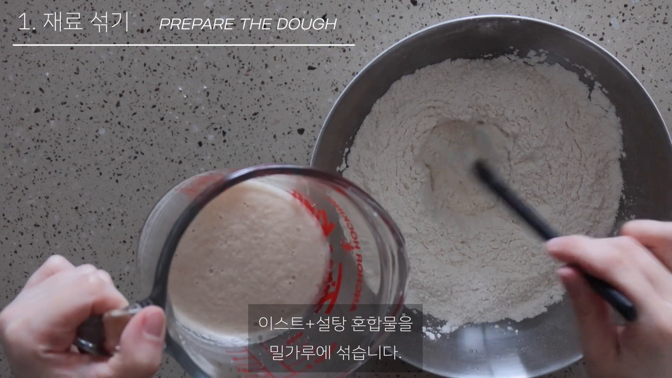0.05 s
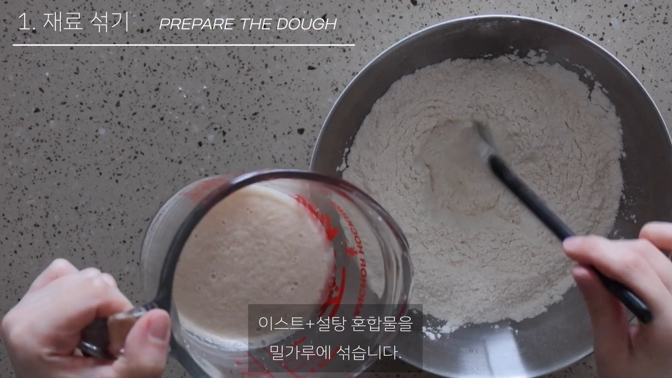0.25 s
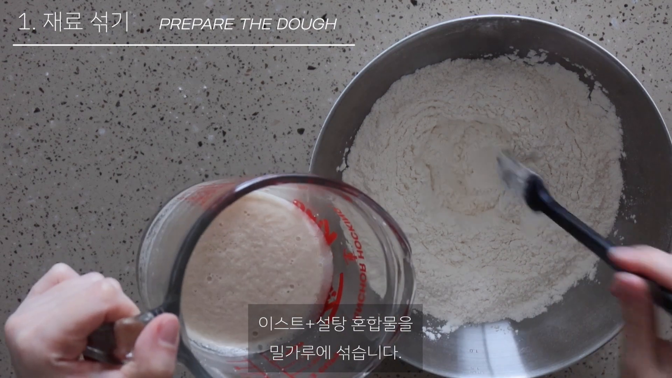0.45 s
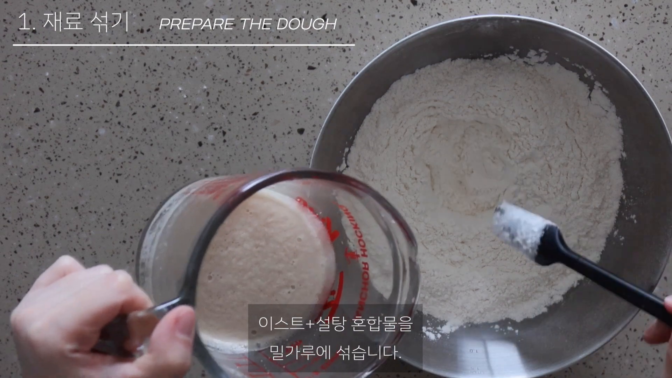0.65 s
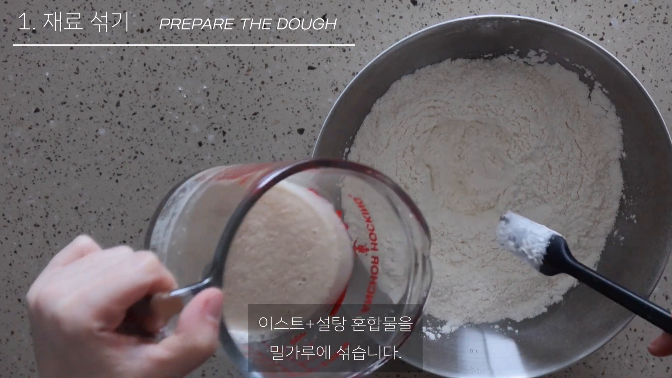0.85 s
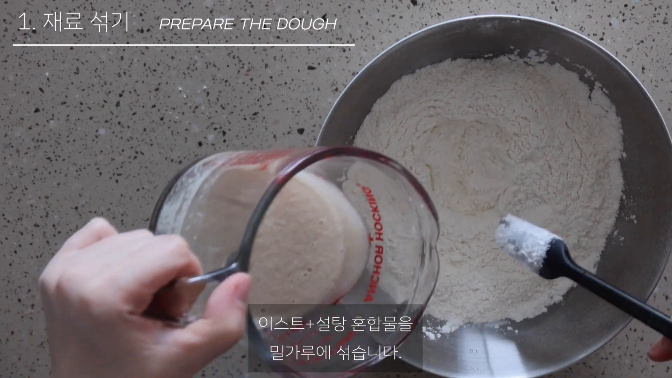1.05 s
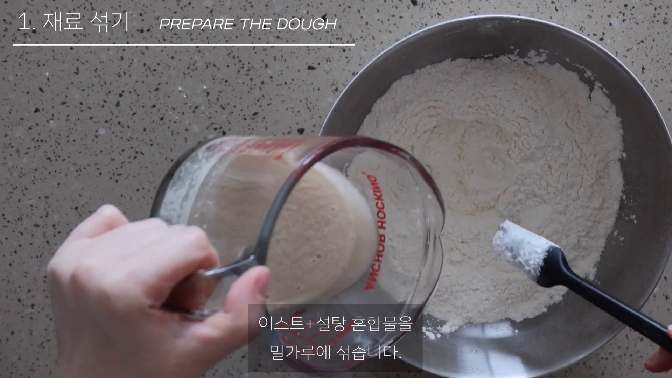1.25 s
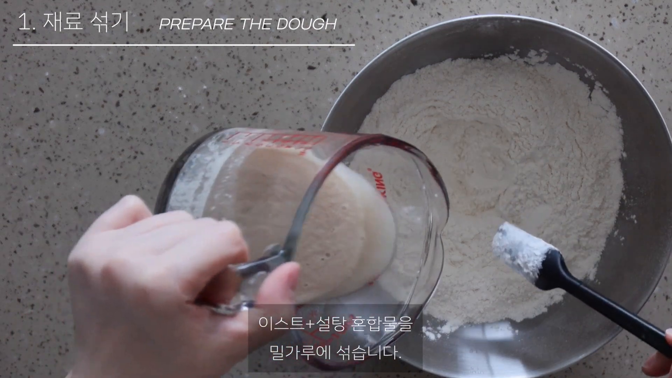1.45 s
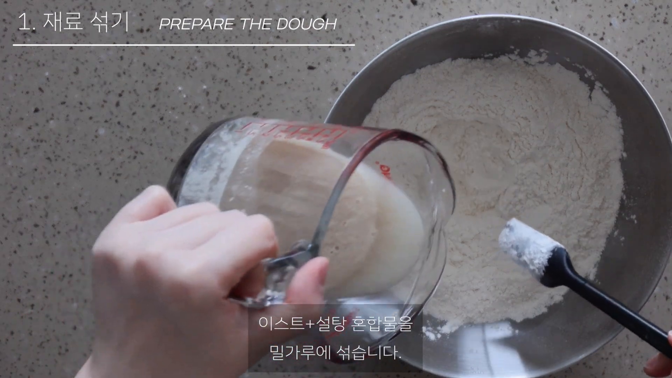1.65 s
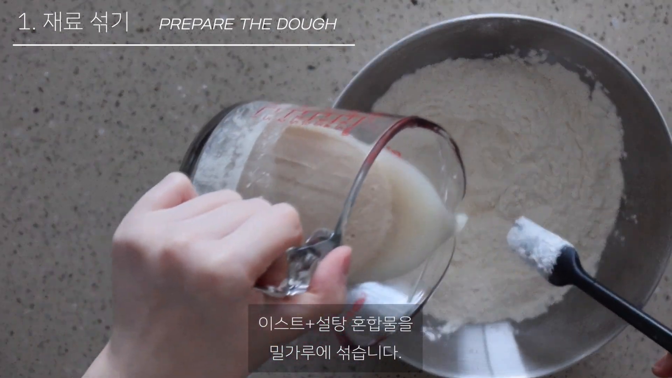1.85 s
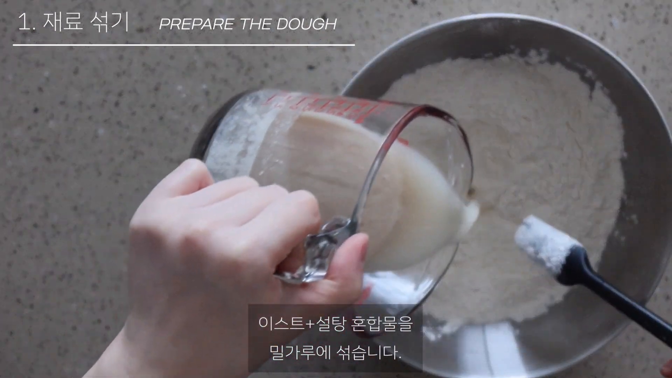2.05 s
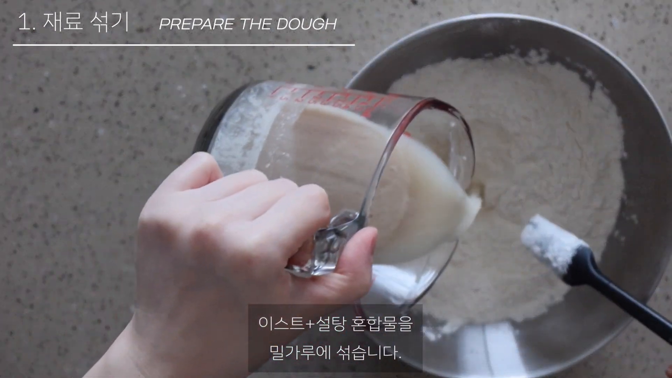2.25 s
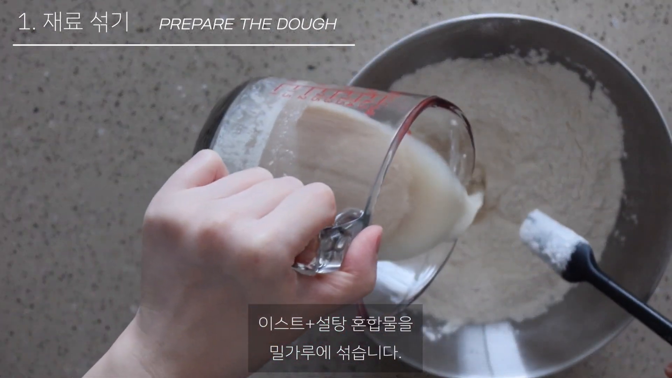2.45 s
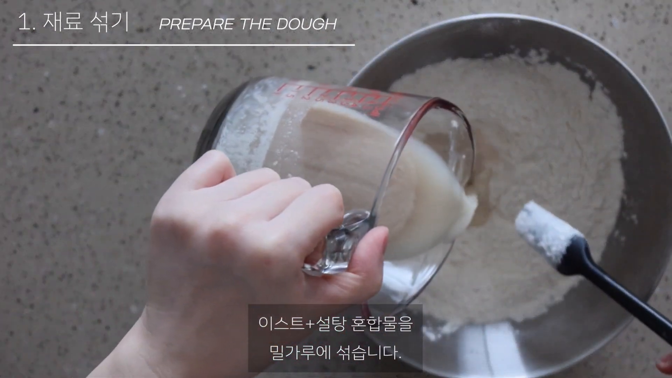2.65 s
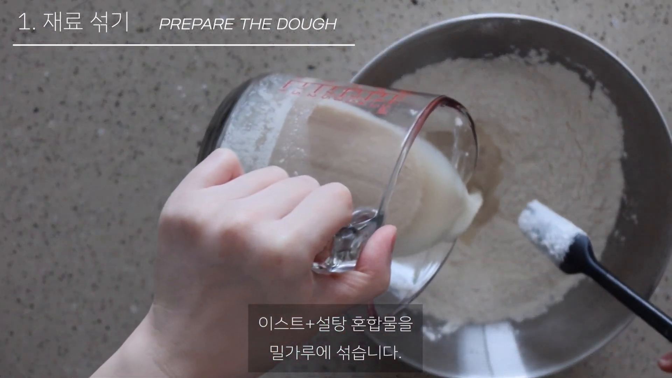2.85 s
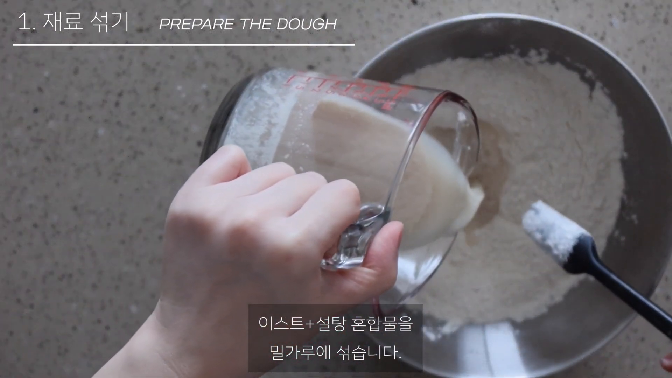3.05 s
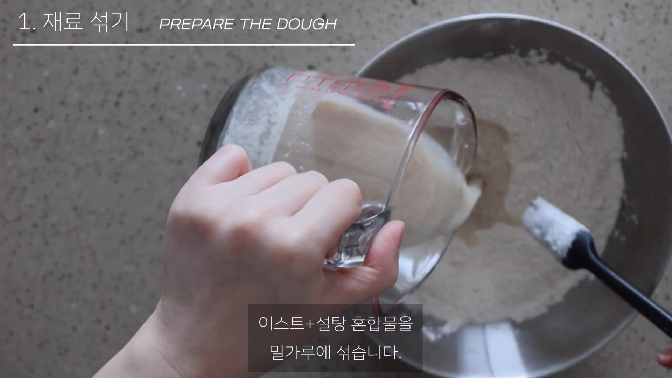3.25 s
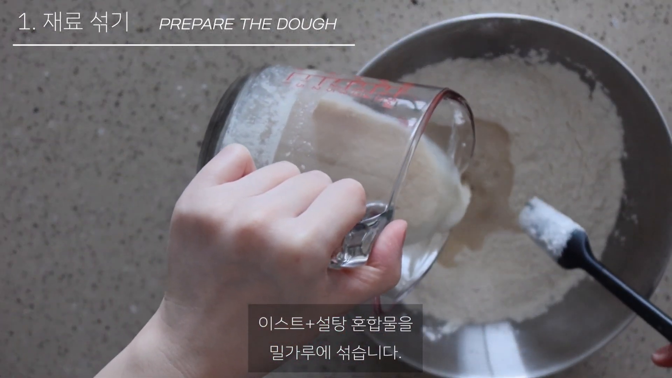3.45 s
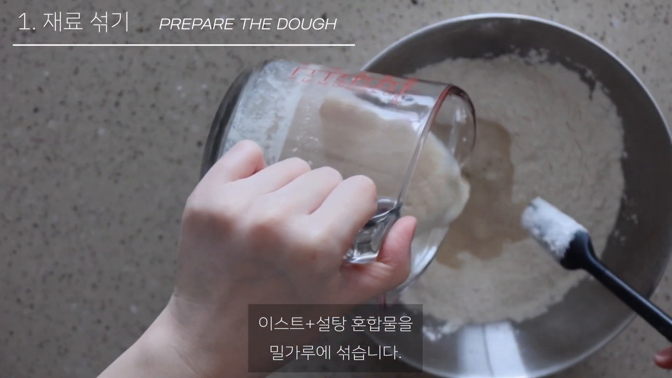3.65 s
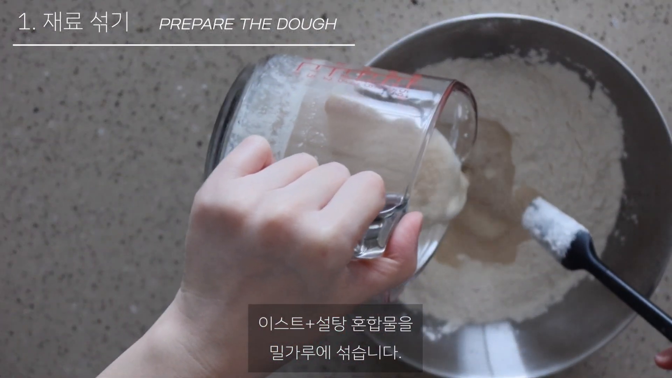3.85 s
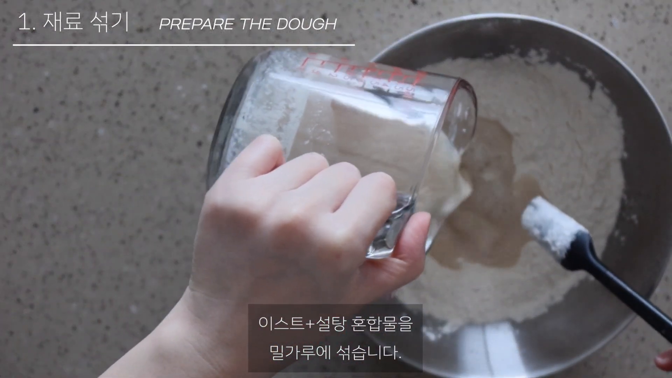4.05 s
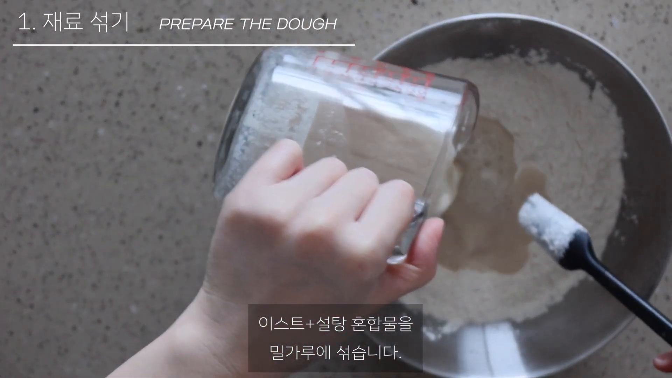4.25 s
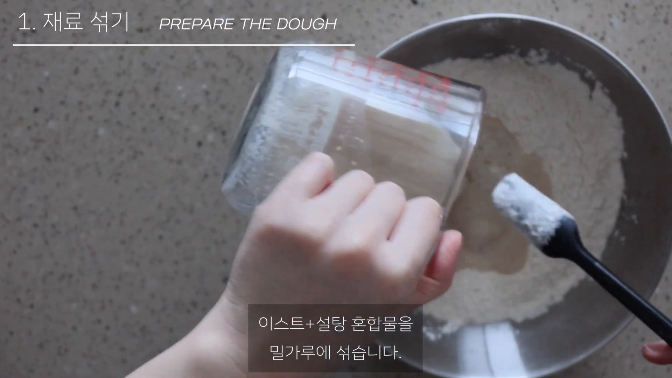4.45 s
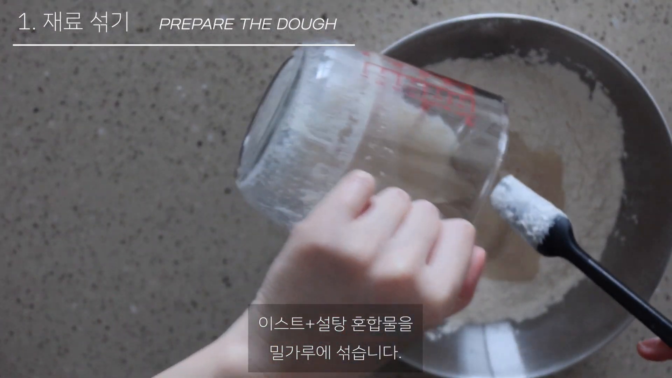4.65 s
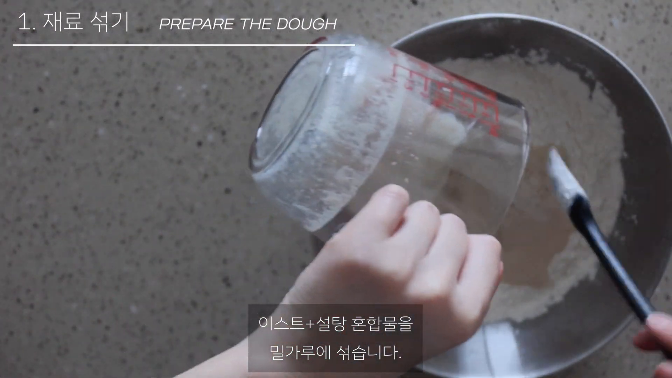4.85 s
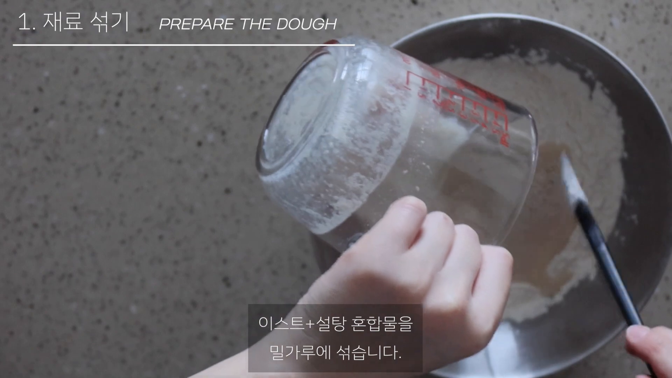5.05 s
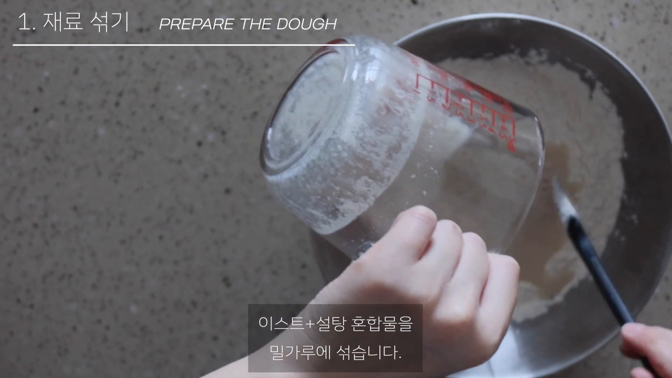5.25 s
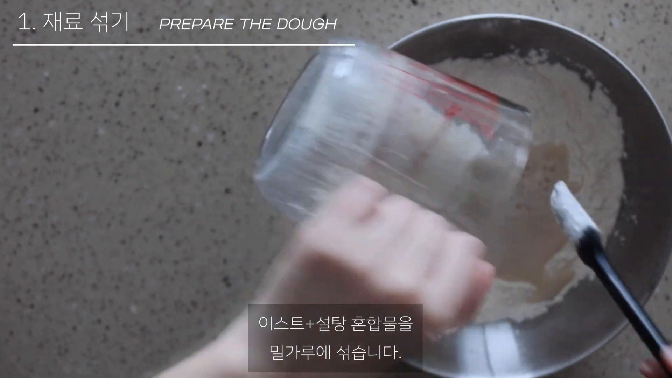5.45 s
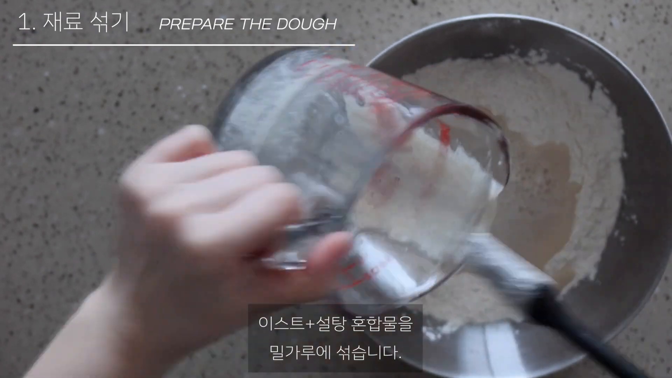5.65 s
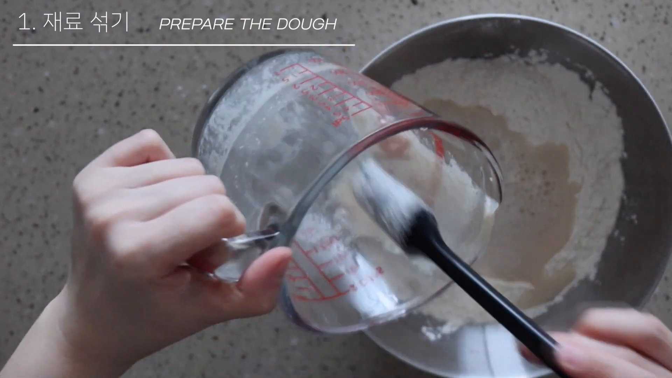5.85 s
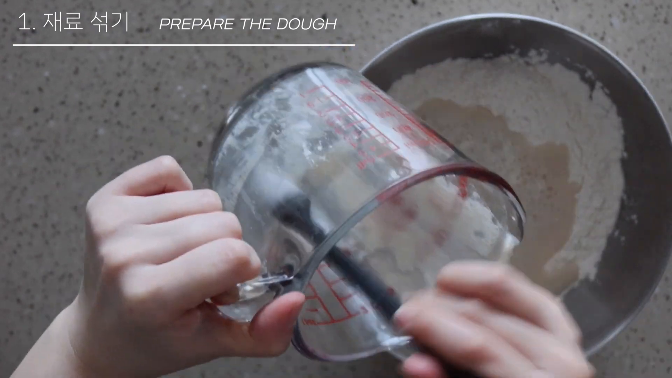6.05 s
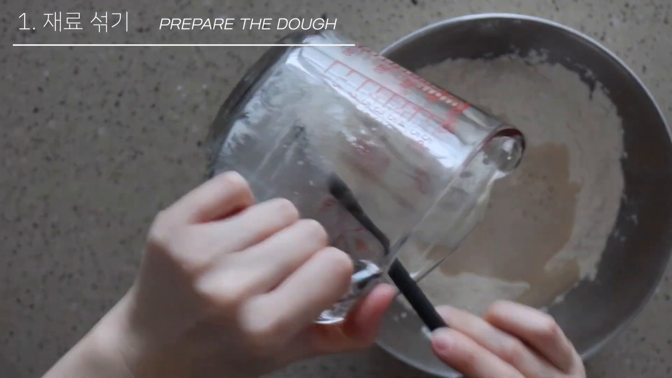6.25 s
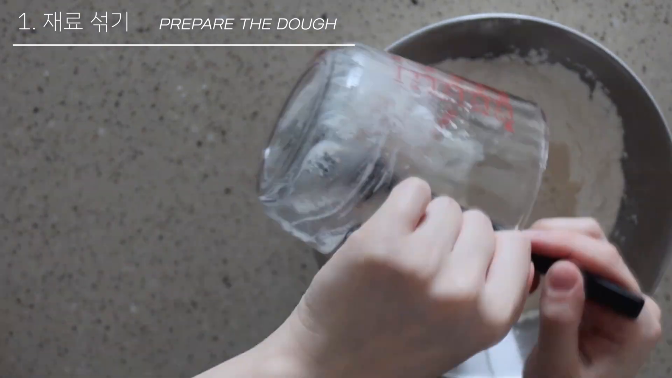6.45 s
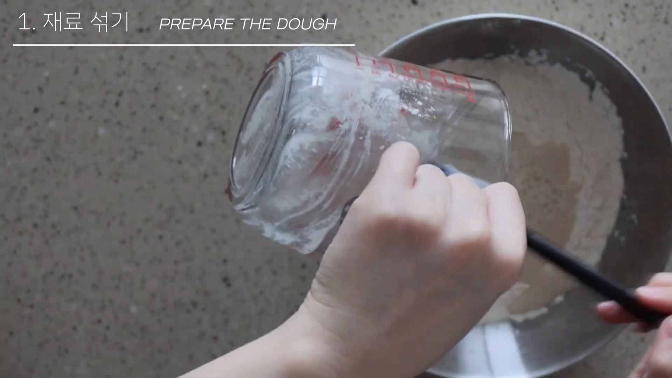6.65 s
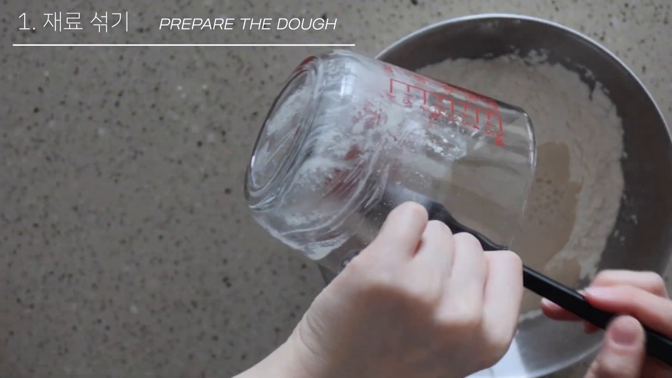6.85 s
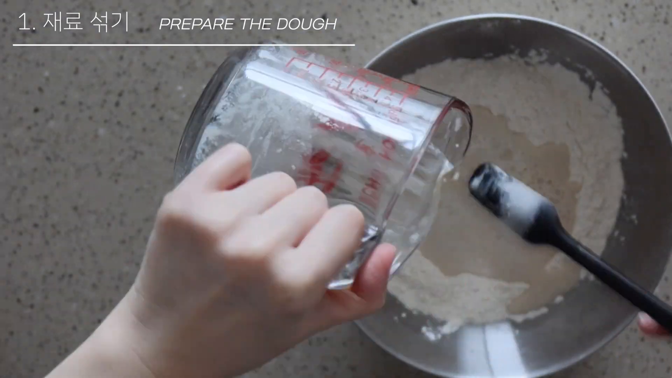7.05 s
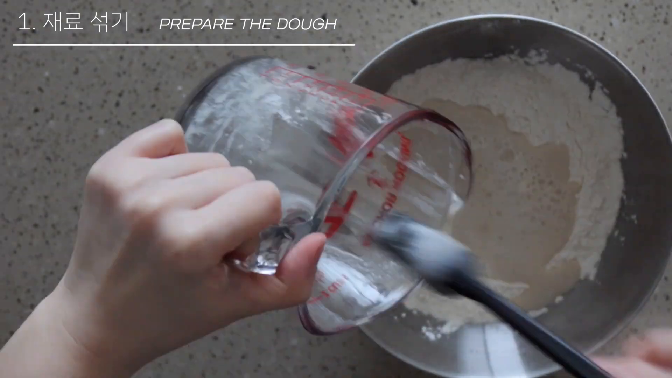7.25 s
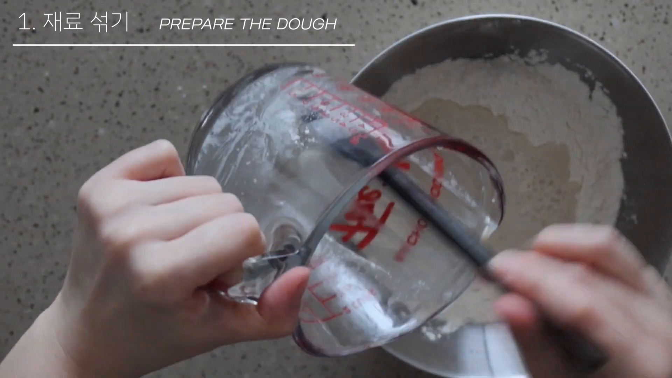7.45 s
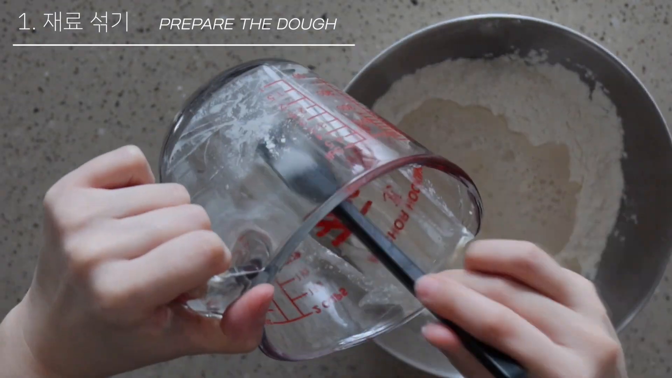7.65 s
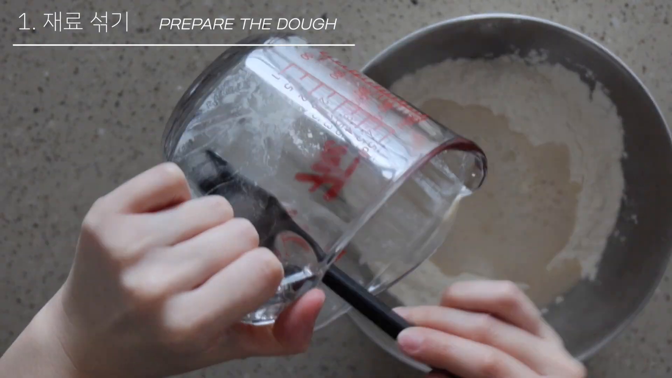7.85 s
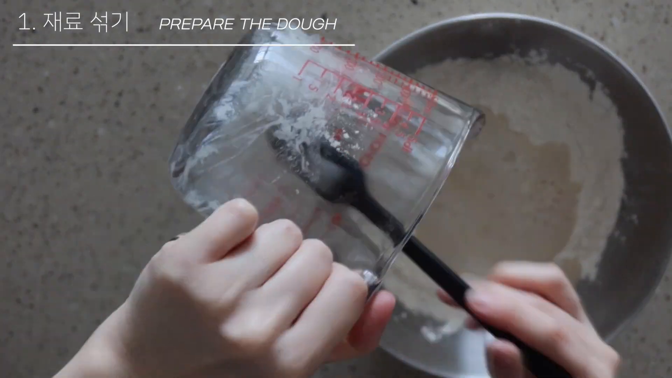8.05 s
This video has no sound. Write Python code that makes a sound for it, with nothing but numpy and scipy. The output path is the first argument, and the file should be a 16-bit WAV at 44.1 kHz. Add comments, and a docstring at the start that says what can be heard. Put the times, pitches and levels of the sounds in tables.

```python
"""A quiet kitchen murmurs (shaped noise and a hum) under hiss; a spatula knocks a steel bowl's rim, which rings.
Foamy liquid pours from a glass cup into flour in the bowl: bubbles made of short fading sine tones, with fizz.
Dull filtered-noise bumps come through the worktop during and just after the pour. Then the background steps down.
Last, the wet silicone spatula squeaks and taps in the cup: uneven overtones, thuds and ticks set the glass ringing."""
import sys
import numpy as np
from scipy import signal
from scipy.fft import rfft, irfft
from scipy.io import wavfile
from scipy.ndimage import uniform_filter1d

SR = 44100
rng = np.random.default_rng(int(sys.argv[2]) if len(sys.argv) > 2 else 0)


def generate_wav(signal):
    """Clip the signal to [-1, 1] and save it as 16-bit WAV at the path in sys.argv[1]."""
    frames = np.transpose(np.atleast_2d(signal))
    scaled = np.clip(frames, -1, 1) * 32767
    pcm = np.round(scaled).astype(np.int16)
    wavfile.write(sys.argv[1], SR, pcm)


N = 357193


def undb(db):
    """Turn decibels into a plain volume factor."""
    return 10 ** (np.asarray(db) / 20)


def unit(x):
    """Scale a sound to an average (rms) level of 1."""
    return x / np.sqrt(np.mean(x ** 2))


def curve(table):
    """Draw straight lines between a table's times: each column at every sample."""
    s, *columns = np.transpose(table)
    return [np.interp(np.arange(N) / SR, s, c) for c in columns]


def add(out, s, x):
    """Mix sound x into out, starting at s seconds."""
    i = int(s * SR)
    out[i:i + len(x)] += x[:N - i]


def coloured(points):
    """Noise shaped to a (frequency [Hz], level [dB]) spectrum, rms 1."""
    hz, db = np.transpose(points)
    f = np.maximum(np.fft.rfftfreq(N, 1 / SR), 1)
    gain_db = np.interp(np.log(f), np.log(hz), db, left=-90, right=-90)
    return unit(irfft(rfft(rng.standard_normal(N)) * undb(gain_db), N))


def band(x, hz, width):
    """Keep mostly the sound around hz, with gain 1 at the centre (a two-pole resonance)."""
    return signal.lfilter(*signal.iirpeak(min(hz, .4 * SR), hz / width, SR), x)


def ring(x, modes):
    """Let x strike a solid body: each mode is a tone that dies away by 60 dB in t60 seconds."""
    out = 0
    for k, (hz, db, t60) in enumerate(modes):
        r = np.exp(-np.log(1000) / (t60 * SR))
        w = 2 * np.pi * hz / SR
        tone = np.sin(w) * signal.lfilter([1], [1, -2 * r * np.cos(w), r * r], x)
        out = out + (-1) ** k * undb(db) * tone  # neighbours swing in opposite sense
    return out


def grain(hz, cycles, glide):
    """A bubble: a fading sine that swells within about a cycle and can slide up in pitch."""
    t = np.arange(int(4 * cycles / hz * SR) + 8) * hz / SR  # time counted in cycles
    tone = np.sin(2 * np.pi * t * (1 + glide * t / cycles))
    return tone * np.exp(-2.5 * t / cycles) * (1 - np.exp(-t / .45))


def walk(rate):
    """Slow random drift: a new target every 1 / rate seconds, joined by slopes; rms 1."""
    k = int(SR / rate)
    held = np.repeat(rng.standard_normal(N // k + 1), k)
    return unit(uniform_filter1d(held, k)[:N])


def kitchen_air():
    """Low murmur, a faint appliance hum and microphone hiss; also gives the hiss for the stereo difference."""
    # background over time: (time [s], murmur level [dB], hiss level [dB])
    air_levels = [(0, -67.5, -68), (.5, -63.5, -68.5), (1.0, -64.5, -67.5), (1.7, -65.5, -68),
                  (2.6, -62, -68.5), (3.6, -62, -65.5), (4.6, -64, -66), (5.5, -66, -67),
                  (5.885, -64.5, -67), (5.9, -71.5, -75), (8.1, -73.5, -75)]
    # colour of the murmur before scaling: (frequency [Hz], level [dB])
    murmur_spectrum = [(12, -27.5), (20, 2), (27, 0.5), (65, -3), (92, 0), (275, -2), (354, -0.5),
                       (464, -4), (494, -1), (538, -3.5), (3000, -16), (3900, -40.5), (6600, -120)]
    # colour of the hiss before scaling: (frequency [Hz], level [dB])
    hiss_spectrum = [(880, -37), (1500, -12), (2300, -6), (2740, -4), (3730, -0.5), (4080, -2.5),
                     (6240, -1.5), (14300, -4.5), (16000, -8.5)]
    hum_hz, hum_db = 499, -15.5  # level relative to the murmur, before its drift

    murmur_db, hiss_db = curve(air_levels)
    hum = undb(hum_db + 2.0 * walk(3.6)) * unit(band(rng.standard_normal(N), hum_hz, 4.6))
    murmur = undb(murmur_db + 1.0 * walk(2.986)) * (coloured(murmur_spectrum) + hum)
    hiss = undb(hiss_db) * coloured(hiss_spectrum)
    side_hiss = undb(hiss_db - 21) * unit(band(rng.standard_normal(N), 13500, 2500))
    return murmur + hiss, side_hiss


def knocks():
    """A soft push rings the bowl's metal; flour adds a dull rattle of noise."""
    # knock on the bowl rim and its small rebounds: (time [s], level before offsets [dB])
    knock_times = [(.919, -11), (0.939, -48), (.962, -30), (1.001, -36), (1.03, -36)]
    # ringing tones of the steel bowl: (frequency [Hz], relative level [dB], t60 [s])
    bowl_modes = [(29, -21, 1.25), (61, -14, 0.67), (100, -12, 0.39), (159, -7.5, 0.38), (183.3, -4.5, 0.4),
                  (260, -5, 0.32), (235, 0, 0.18), (287.5, -2.5, 0.34), (404, -9, 0.22), (494, 11, 0.093),
                  (535, 1, 0.16), (590, 4, 0.15), (745, -15, 0.3), (782, -13.5, 0.33), (823, -12, 0.36),
                  (830, -5, 0.22), (937, -17.5, 0.42), (1280, -6, 0.064), (1381, -1, 0.08),
                  (1366, -20, 0.5), (1765, -7, 0.058), (1840, -18, 0.21), (2270, -9.5, 0.072),
                  (3630, -9.5, 0.13)]

    out, drive = np.zeros(N), np.zeros(N)
    t = np.arange(SR) / SR
    for s, db in knock_times:
        add(drive, s, undb(db - 39) * np.hanning(20))
        noise = rng.standard_normal(len(t))
        dull = band(band(noise * np.exp(-t / 0.023), 454, 860), 454, 860)
        add(out, s, undb(db - 3.5) * band(dull, 500, 2100))
    # the first knock also has a short, bright tick
    add(out, knock_times[0][0], undb(-43.5) * band(noise, 7900, 2100) * np.exp(-t / 0.0055))
    return out + ring(drive, bowl_modes)


def room(x):
    """Kitchen walls: spread x over a dull tail of noise that dies away."""
    t60_s = .3
    t = np.arange(int(.6 * SR)) / SR
    noise = band(rng.standard_normal(len(t)), 1500, 6000)
    tail = noise * undb(-60 * t / t60_s) * np.clip(t / 0.002, 0, 1)
    return signal.fftconvolve(x, tail / np.sqrt(np.sum(tail ** 2)))[:N]


def scatter(rate, low_s, high_s, hz_of, cycles, spread_db):
    """Small bubbles at random moments, some louder than the rest; rms 1 while they last."""
    out = np.zeros(N)
    for when, pitch, size in rng.random((int(rate * (high_s - low_s)), 3)):
        s = low_s + when * (high_s - low_s)
        loudness = undb(-spread_db * np.log(1.01 - size))
        add(out, s, loudness * grain(hz_of(s, pitch), cycles, .06))
    return out / np.sqrt(np.mean(out[int(low_s * SR):int(high_s * SR)] ** 2))


def splash(out, s, db, plop_hz, spray_hz, spray_db, trail):
    """A slap, a plop with overtones and spray, then smaller bubbles as the hollow closes."""
    t = np.arange(SR // 200) / SR
    burst = rng.standard_normal(len(t)) * np.exp(-t / .0008)
    add(out, s, undb(db - 4) * band(burst, 1.25 * plop_hz, 2000))  # the slap
    add(out, s, undb(db - 21) * grain(13200, 12, 0.0))
    add(out, s, undb(db) * grain(plop_hz, 5.1, 0.038))
    add(out, s, undb(db - 0.5) * grain(1.67 * plop_hz, 2.7, 0.061))
    add(out, s, undb(db - 12.5) * grain(2460, 12, 0.023))  # the bowl's hollow answers
    add(out, s, undb(db + spray_db) * grain(spray_hz, 18, 0.024))
    add(out, s, undb(db - 10.5) * grain(0.536 * plop_hz, 3.2, 0.0))
    for late, pitch in trail:
        bubble = grain(plop_hz * 2 ** (.4 * (pitch - .3)), 6, 0.12)
        add(out, s + 0.002 + .016 * late, undb(db - 8 - 10 * late) * bubble)


def pour():
    """Splashing liquid traps air, heard as bubble tones: splashes and bright clicks over gurgle, spatter and fizz."""
    # the stream: (time [s], flow level before offsets [dB], gurgle pitch guide [Hz])
    stream = [(1.98, -76, 1200), (2.28, -74, 1550), (2.4, -63, 1500), (2.54, -67, 1900), (2.6, -59, 2600),
              (2.66, -56.5, 1750), (2.75, -55, 2350), (2.79, -57, 1500), (2.84, -62, 1900),
              (2.9, -58.5, 2250), (3.08, -59.5, 2200), (3.45, -60, 1700), (3.65, -66, 2200),
              (3.95, -65, 2000), (4.02, -76, 1600), (4.09, -60, 1770), (4.17, -74, 1050), (4.65, -71, 1070),
              (4.8, -80, 1300)]
    # foam fizzing: (time [s], level before an offset [dB])
    foam = [(2.0, -72), (2.42, -70.5), (2.54, -66), (3.57, -74), (3.71, -76), (4.71, -65), (5.36, -74),
            (5.81, -71), (5.89, -72)]
    # louder splashes: (time [s], plop level [dB], plop pitch [Hz], spray pitch [Hz], spray relative to plop [dB])
    splashes = [(2.007, -48, 750, 4200, -7), (2.022, -38.5, 905, 5400, -10), (2.042, -40.5, 1930, 8600, -4),
                (2.059, -40.5, 1920, 5030, -4.5), (2.136, -50, 930, 6600, 2), (2.324, -52, 1640, 5620, 1),
                (2.362, -46, 1440, 5530, -15), (2.385, -37.5, 1630, 5990, -15),
                (2.414, -43.5, 1370, 6590, -18), (2.436, -43, 2140, 7310, -5), (2.45, -39, 1240, 6700, 2),
                (2.455, -38.5, 2130, 5430, -25), (2.472, -41, 2060, 6590, -14),
                (2.503, -40.5, 2060, 5270, -1), (2.541, -52, 905, 6640, 2), (2.59, -29, 3470, 5250, -9),
                (2.615, -33, 2730, 4360, -27), (2.655, -31, 1710, 8680, -24), (2.681, -44, 2000, 8650, -6),
                (2.706, -40, 2200, 6500, -7), (2.724, -45, 2200, 5400, -3), (2.75, -40, 2630, 8800, -4),
                (2.777, -32, 1460, 5560, -27), (2.807, -37.5, 1550, 4740, -24),
                (2.868, -43, 1830, 4900, -2), (2.89, -39.5, 2280, 5250, -13), (2.912, -42, 2820, 5470, -10),
                (2.931, -50, 1210, 7140, 8), (2.994, -40.5, 2500, 4700, -6), (3.029, -39, 2300, 4710, -22),
                (3.057, -38.5, 2790, 4020, -12), (3.107, -39.5, 2200, 8700, -3),
                (3.128, -42, 1820, 5350, -18), (3.196, -43, 2400, 4960, -14),
                (3.214, -35.5, 2290, 5540, -4), (3.267, -39.5, 4000, 5350, -0.5),
                (3.303, -41, 1040, 4020, -3), (3.324, -34, 2420, 4500, -13), (3.412, -42, 1090, 4370, -17),
                (3.504, -36.5, 1900, 8300, -2), (3.605, -40, 2250, 5540, -11),
                (3.653, -41.5, 2280, 8400, -4), (3.687, -39, 2620, 4500, -14), (3.791, -45, 1220, 8400, -1),
                (3.837, -40.5, 2100, 5300, -11), (3.847, -43, 2360, 6590, -16),
                (3.917, -45.5, 1230, 4840, -5), (3.964, -42.5, 3130, 5090, -15),
                (4.05, -37, 1590, 4160, -13), (4.079, -40, 1840, 5480, -13),
                (4.106, -37.5, 1690, 5440, -15), (4.119, -52, 1700, 5500, 10),
                (4.148, -38.5, 1060, 7810, 0), (4.19, -29, 963, 8400, -12), (4.22, -42, 1290, 4200, -4),
                (4.245, -38.5, 996, 6250, -22), (4.267, -48, 2500, 4220, 0),
                (4.335, -43.5, 2660, 4720, -14), (4.428, -42.5, 930, 8770, -18),
                (4.444, -42, 925, 7930, -17), (4.486, -36.5, 975, 4880, -16),
                (4.573, -38.5, 970, 4800, -31), (4.659, -43, 920, 8660, -23)]
    # bright high clicks, nearly all on splashes: (time [s], level of each of their tones [dB])
    bright_clicks = [(2.344, -54.5), (2.362, -55), (2.655, -58), (2.681, -44.5), (2.706, -53),
                     (3.107, -53.5), (3.128, -60), (3.214, -59.5), (3.303, -52), (3.324, -45), (3.36, -60),
                     (3.412, -44), (3.504, -47.5), (3.605, -49), (3.917, -59.5), (4.05, -45),
                     (4.148, -46.5), (4.19, -51)]
    # fine spatter thrown up around the stream: (time [s], level before drift [dB])
    spatter_levels = [(1.98, -80), (2.35, -74), (2.55, -66), (2.8, -78), (2.97, -61), (3.15, -67),
                      (3.55, -66), (3.7, -71), (3.95, -67), (4.02, -75), (4.12, -62), (4.3, -71),
                      (4.45, -78), (4.8, -82)]
    small_per_s = 9
    # small splashes: level at a flow of -60 dB, share of the flow's changes, spray relative to plop [dB]
    small_db, small_follows, small_spray_db = -48, .4, -8

    out = np.zeros(N)
    flow_db, hz = curve(stream)
    start, end = stream[0][0], stream[-1][0]
    for row, trail in zip(splashes, rng.random((len(splashes), 4, 2))):
        splash(out, *row, trail)
    for when, pitch, spray, *trail in rng.random((int(small_per_s * (end - start)), 11)):
        s = start + when * (end - start)
        i = int(s * SR)
        db = small_db + small_follows * (flow_db[i] + 60)
        plop_hz = hz[i] * 2 ** (pitch - .5)
        splash(out, s, db, plop_hz, 4200 * 2 ** spray, small_spray_db, np.reshape(trail, (4, 2)))
    for s, db in bright_clicks:
        for click_hz, cycles in (8750, 21), (12600, 24), (14000, 30):
            add(out, s, undb(db) * grain(click_hz, cycles, 0.0))

    # in each scatter, u from 0 to 1 picks the bubble's pitch
    gurgle = scatter(350, start, end, lambda s, u: hz[int(s * SR)] * 2 ** (.5 * (u - .45)), 10.5, 5.8)
    patter = scatter(900, start, end, lambda s, u: 800 * 2 ** (2.22 * u), 3, 1.9)
    spatter = scatter(400, start, end, lambda s, u: 4100 * 2 ** (.6 * u), 16, 4.5)
    fizz = scatter(2300, foam[0][0], foam[-1][0], lambda s, u: 6500 * 2 ** (0.45 * u ** 0.45), 16, 4.2)
    crackle = scatter(200, start, end, lambda s, u: 11500 * 2 ** (0.38 * u), 18, 5.0)

    bubbles = gurgle + undb(2.5) * patter + undb(-7) * crackle
    out += undb(flow_db - 6.5 + 1.5 * walk(14)) * bubbles
    out += undb(curve(spatter_levels)[0] + 2.5 * walk(10)) * spatter
    return out + undb(curve(foam)[0] - 3.5) * fizz


def worktop_bumps():
    """Dull bumps through the worktop: low noise that swells and dies away, with a brighter scuff."""
    # (time [s], thud level before its fade [dB], filter centre [Hz], filter width [Hz], rise [ms], t60 [s],
    #  scuff relative to thud [dB])
    bumps = [(3.755, -50.5, 238, 151, 6.2, 0.15, -33), (3.77, -53.5, 75, 40, 20, 0.47, -44),
             (4.926, -48, 423, 250, 2.8, 0.16, -8.5), (4.95, -49, 400, 255, 5, 0.24, -18)]
    out = np.zeros(N)
    t = np.arange(SR) / SR
    for s, db, hz, width, rise_ms, t60, scuff_db in bumps:
        noise = rng.standard_normal(len(t))
        thud = unit(band(band(noise, hz, width), hz, width))
        scuff = undb(scuff_db) * unit(band(noise, 2230, 1700))
        rise = np.clip(t * 1000 / rise_ms, 0, 1)
        add(out, s, undb(db - 60 * t / t60) * rise * (thud + scuff))
    return out


def spatula():
    """Stick-slip squeaks (the blade grips and slips over and over) and soft taps; both set the glass ringing."""
    # squeaks on wet glass: (time [s], level before shaping [dB], starting slip rate before wobble [Hz],
    #  glide as a share of that rate, colour centre [Hz], hold [ms], fall t60 [ms], added fundamental [dB])
    squeaks = [(5.949, -40, 1533, -.011, 3300, 3.6, 15, -26), (5.987, -40, 2100, .06, 4200, 1.9, 10, -2),
               (5.999, -34, 1816, .042, 7250, 1.8, 20, -8), (6.011, -55.5, 1864, .02, 7400, 12, 17, -5),
               (6.208, -53, 1750, .0, 3530, 1.9, 5.6, -24), (6.28, -43, 1716, -.034, 5600, 13.7, 13, 0),
               (6.304, -34.5, 1482, .031, 4070, 5, 30, -29), (6.322, -55, 1495, -.038, 4950, 39, 110, -30),
               (6.378, -48.5, 1450, -.003, 5100, 4, 200, -33), (6.416, -47.5, 1625, -.1, 4830, 14, 17, -4),
               (6.432, -42.5, 1447, .07, 5100, 24, 40, -5), (6.459, -51.5, 1534, -.047, 6000, 65, 160, -9),
               (6.885, -40.5, 1450, .01, 8270, 14, 33, -2.5), (6.898, -48.5, 1384, .2, 2900, 17, 10, -20),
               (6.912, -60.5, 1450, -.02, 5800, 50, 260, -4), (7.096, -47.5, 3364, .021, 7550, 5, 4.7, -23),
               (7.11, -52, 3340, -.061, 7100, 1.5, 3.6, -23),
               (7.228, -56.5, 1750, -.016, 5900, 4, 5.3, -30), (7.268, -57.5, 1580, .043, 6300, 12, 6, -29),
               (7.661, -53.5, 2000, .07, 6200, 5, 16, -9), (7.745, -52, 2605, .11, 6550, 10.7, 47, -9),
               (7.801, -46, 2670, -.11, 11000, 5.5, 14, -25), (7.979, -53, 1550, .0, 5700, 21, 8.8, -8.5),
               (7.999, -48.5, 1584, .052, 5830, 3, 27, -37), (8.088, -55, 1990, .019, 7540, 7.3, 27, -28)]
    # taps on the cup: (time [s], thud level [dB], thud pitch [Hz], tick over thud before halving [dB],
    #  push on the glass over thud before quartering [dB])
    taps = [(6.145, -41.5, 500, -1, -22), (6.147, -47, 1050, -20, -35), (6.306, -43.5, 781, -5, -18),
            (6.44, -50, 1000, -20, -30), (7.344, -41, 1690, -33, -19), (7.345, -47, 700, -20, -35),
            (7.461, -57.5, 2300, 3, -10), (7.52, -48.5, 1030, 4.5, -17), (7.925, -55, 525, 10, -23)]
    # ringing tones of the glass: (frequency [Hz], relative level [dB], t60 [s])
    glass_modes = [(1398, -7, .12), (1687, -2, 0.052), (2334, 3.5, 0.038), (3080, -7.5, 0.056),
                   (3920, -5.5, 0.084), (4470, -11, 0.085), (5870, -6, 0.13), (7280, -8, .06)]
    grip_ms, grip_share = 1.3, .08  # a longer stroke grips more slowly
    clean_rough, rough_per_db = .44, .009  # roughness 0-1 grows as the fundamental weakens

    out, ticks, drive = np.zeros((3, N))
    for s, db, slip_hz, glide, colour_hz, hold_ms, fall_ms, first_db in squeaks:
        rough = np.clip(clean_rough - rough_per_db * first_db, 0, 1)
        rise_ms = grip_ms + grip_share * hold_ms
        stroke_ms = rise_ms + hold_ms
        ms = np.arange(int((stroke_ms + fall_ms) * SR / 1000)) * 1000 / SR
        wobble, noise, flutter = rng.standard_normal((3, SR // 2))[:, :len(ms)]
        slide = glide * np.minimum(ms / stroke_ms, 1)
        rate = slip_hz * (1 + slide + 0.38 * rough * uniform_filter1d(wobble, 60))
        phase = 2 * np.pi * np.cumsum(rate) / SR
        # each overtone fades in and out on its own as the blade edge flexes
        slips = 0
        for k in range(1, int(13000 / slip_hz)):
            fade = undb(59 * uniform_filter1d(np.roll(flutter, 700 * k), 200))
            slips = slips + fade * np.cos(k * phase + .6 * k * k)
        raw = np.sqrt(1 - rough ** 2) * unit(slips) + rough * noise
        # a broad and a narrow resonance colour the squeak
        width = 1.44 * colour_hz
        broad = band(band(raw, colour_hz, width), colour_hz, width)
        tone = unit(broad + 1.64 * band(raw, colour_hz, 0.1 * colour_hz))
        tone += undb(first_db) * np.cos(phase)
        shape = np.clip(ms / rise_ms, 0, 1) * undb(-60 * np.maximum(ms - rise_ms - hold_ms, 0) / fall_ms)
        shape = shape * undb(20 * rough * uniform_filter1d(flutter, 100))  # the grip comes and goes
        add(out, s, undb(db) * tone * shape / 2)
        add(drive, s, undb(db - 50) * raw * shape)
    for s, db, thud_hz, tick_db, glass_db in taps:
        add(out, s, undb(db) * grain(thud_hz, 3.9, 0.0))
        tick = rng.standard_normal(200) * np.exp(-np.arange(200) / 40)
        add(ticks, s, undb(db + tick_db) * tick / 2)
        add(drive, s, undb(db + glass_db) * np.hanning(9) / 4)
    soften = signal.butter(2, 10500, fs=SR, output="sos")
    return signal.sosfilt(soften, out) + ticks + ring(drive, glass_modes)


def scene():
    """Mix the sources, their room tail and the background, then make the sound slightly stereo."""
    air, side_hiss = kitchen_air()
    near = knocks() + pour() + worktop_bumps() + spatula()
    mid = near + undb(-22) * room(near) + air
    # almost mono: a faint treble, 300 samples late, and a hiss enter the channels with opposite signs
    side = undb(-29) * np.roll(band(mid, 7000, 14000), 300) + side_hiss
    return np.array([mid + side, mid - side])


def record(dry):
    """The recorder cuts the top: a steep filter removes sound above about 15.9 kHz."""
    return signal.sosfilt(signal.ellip(10, .2, 70, 15900, fs=SR, output="sos"), dry)


dry = scene()
out = record(dry)
generate_wav(out)
```